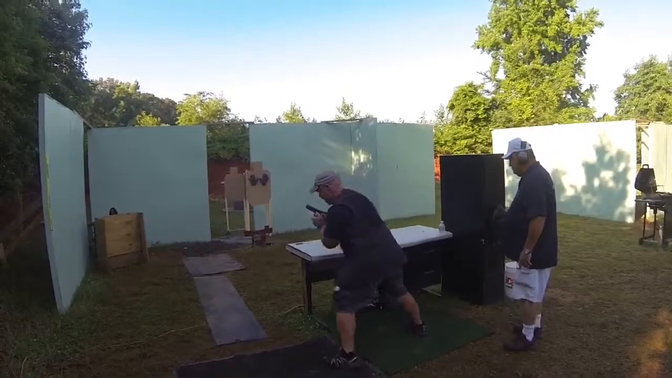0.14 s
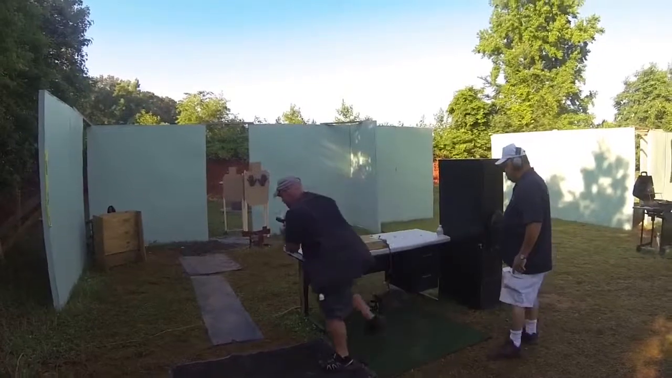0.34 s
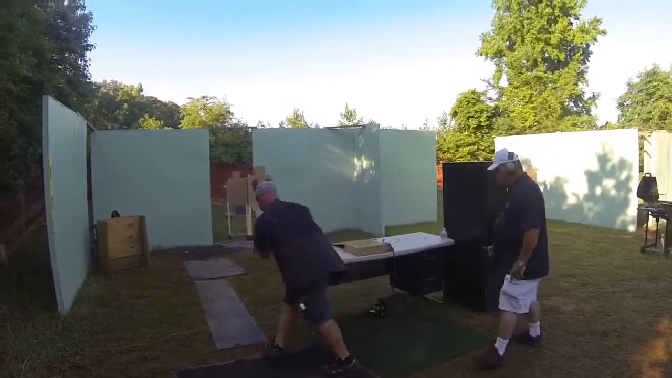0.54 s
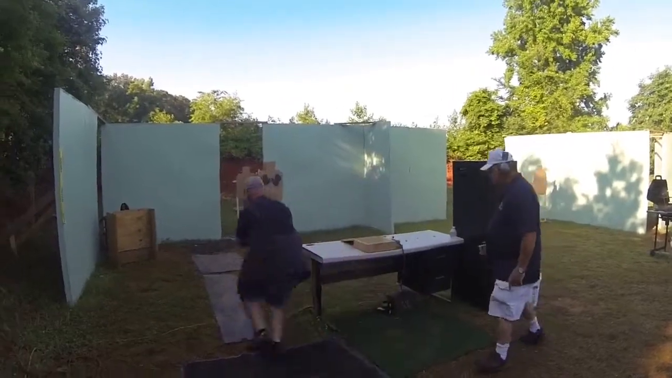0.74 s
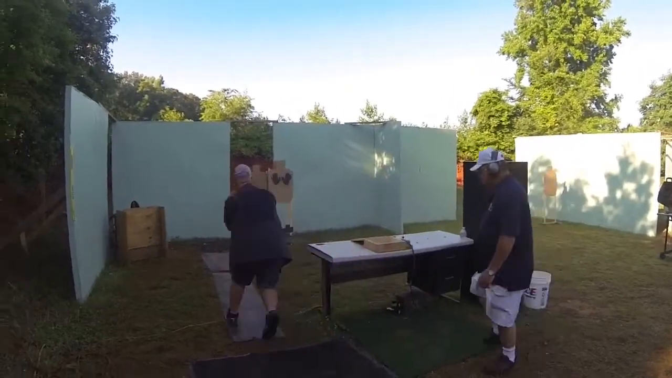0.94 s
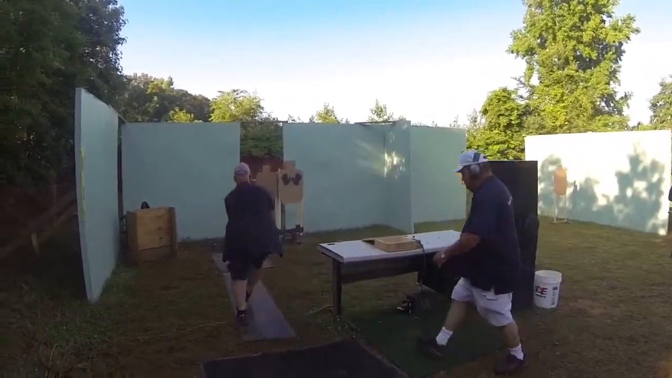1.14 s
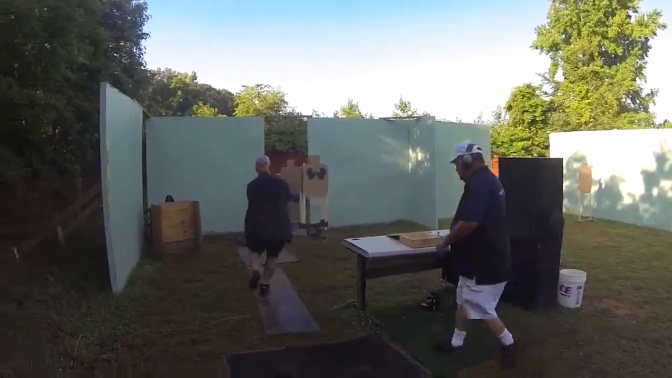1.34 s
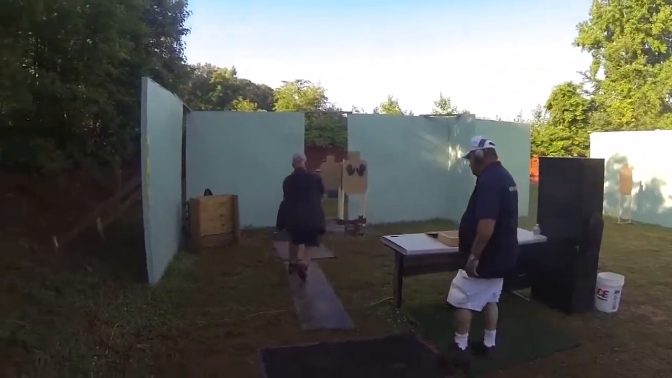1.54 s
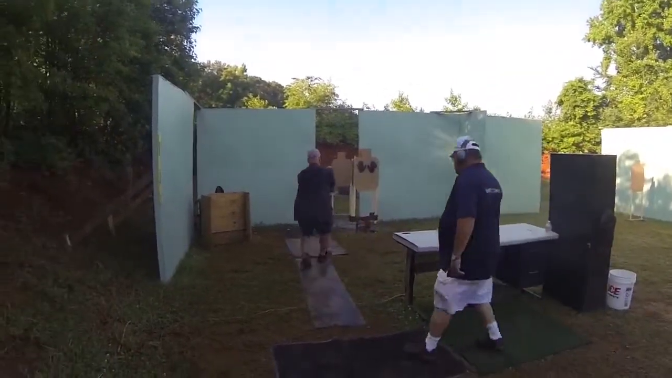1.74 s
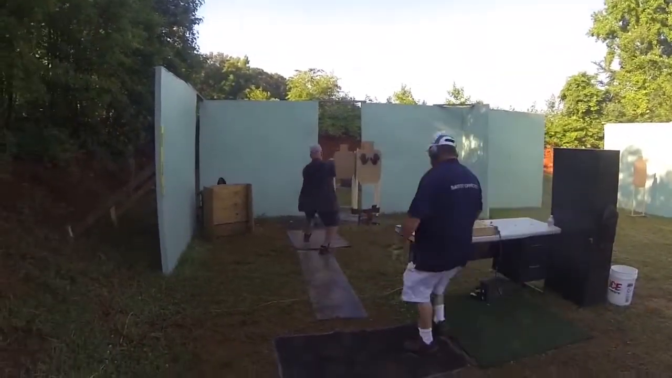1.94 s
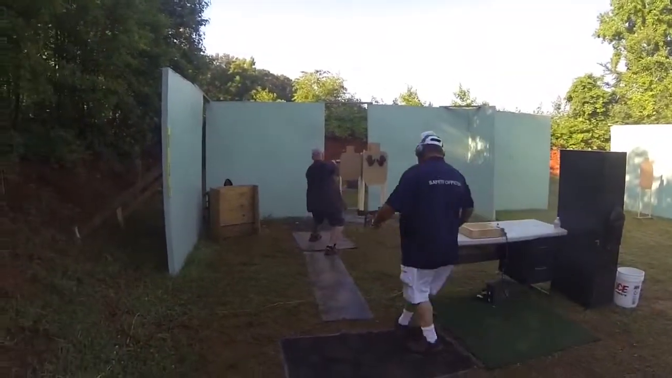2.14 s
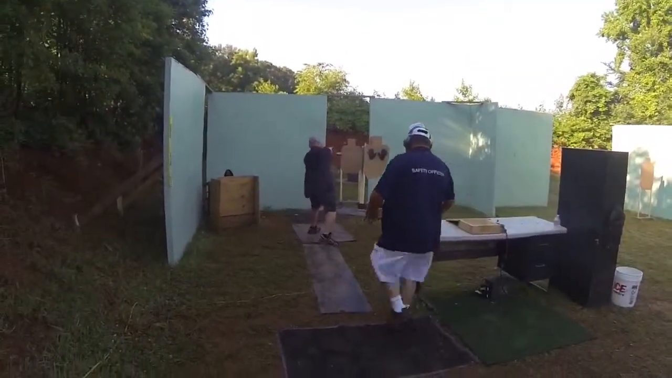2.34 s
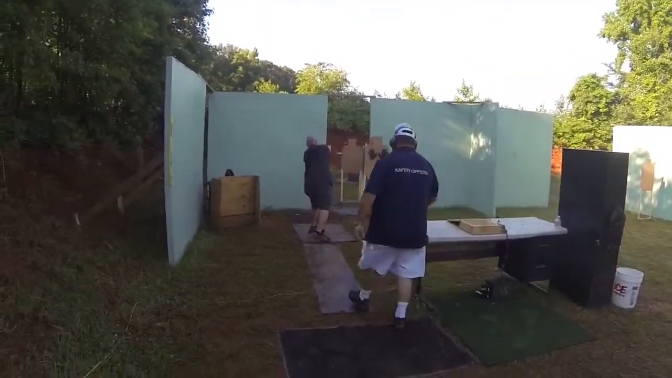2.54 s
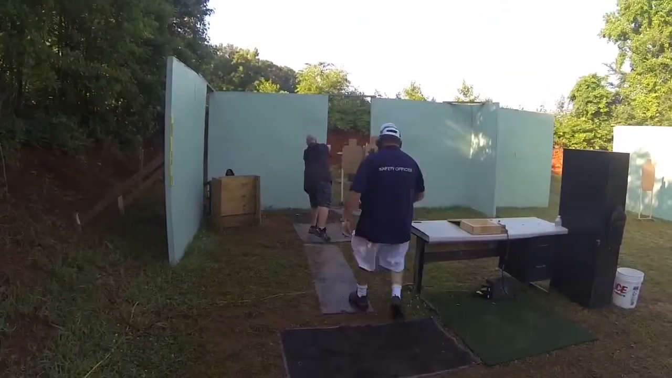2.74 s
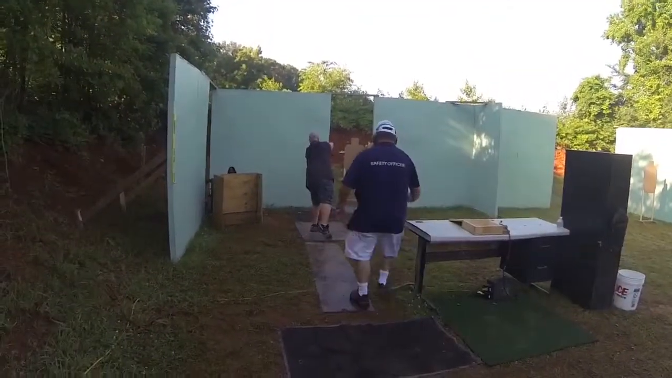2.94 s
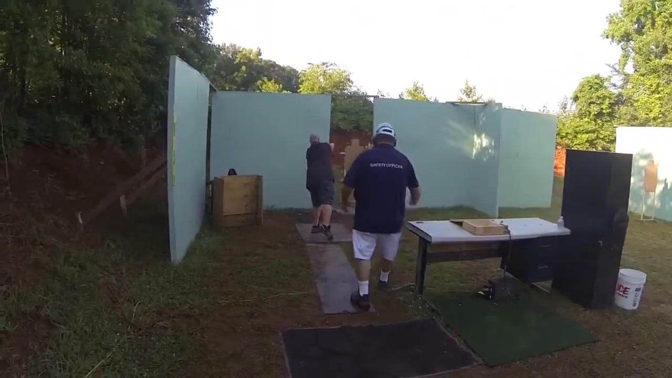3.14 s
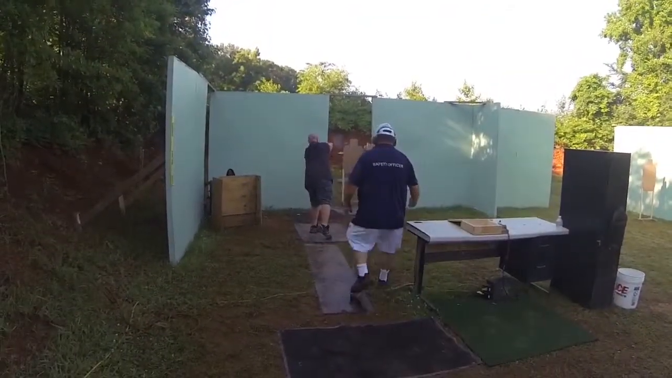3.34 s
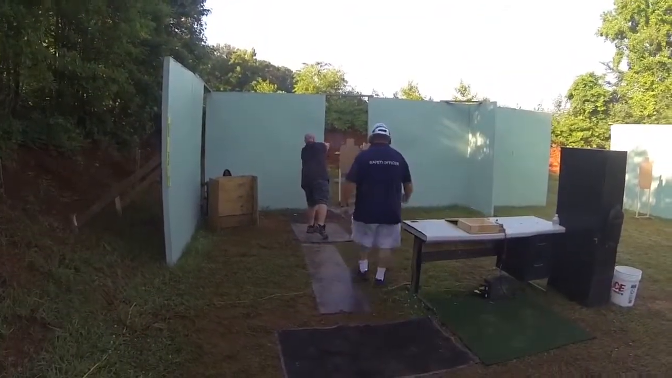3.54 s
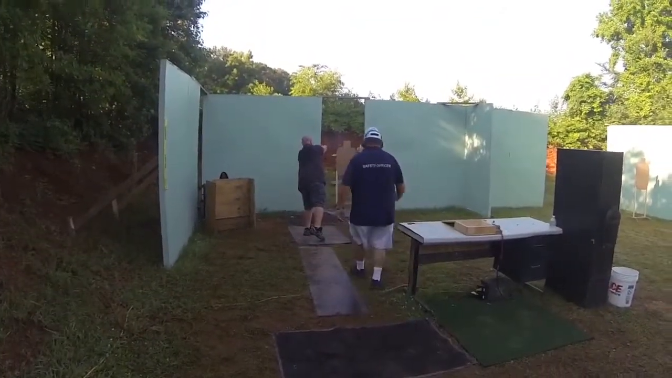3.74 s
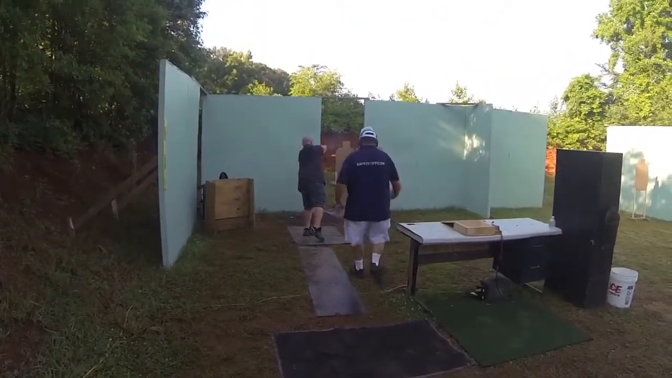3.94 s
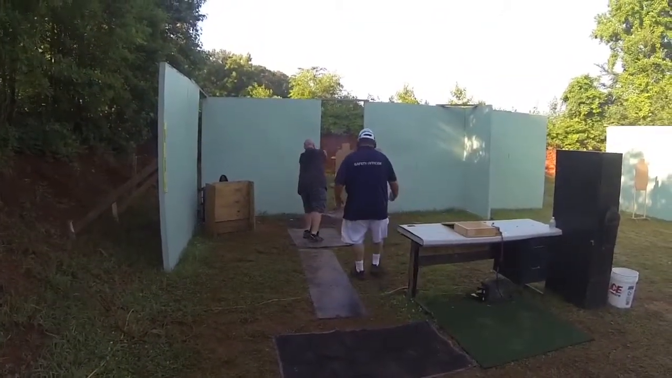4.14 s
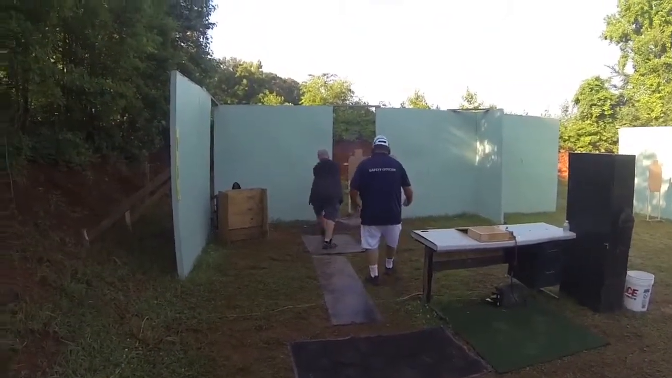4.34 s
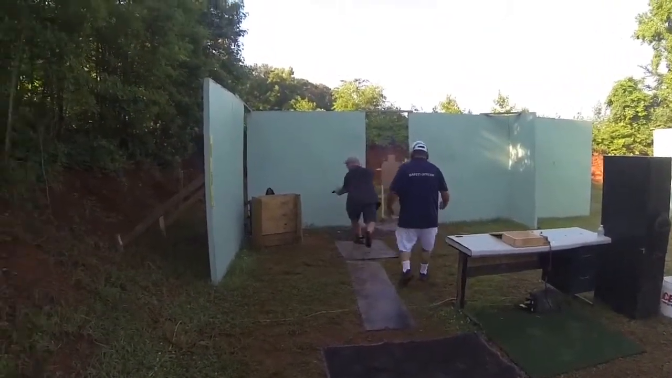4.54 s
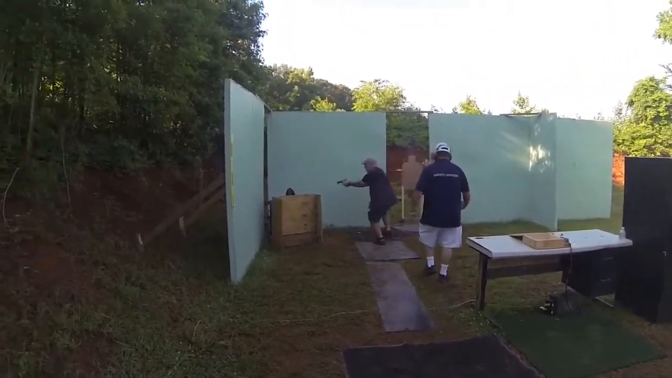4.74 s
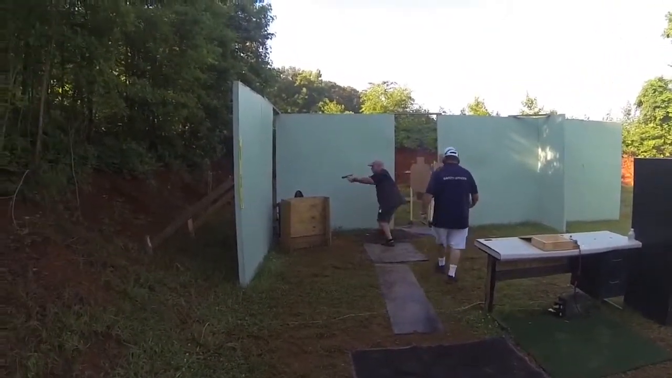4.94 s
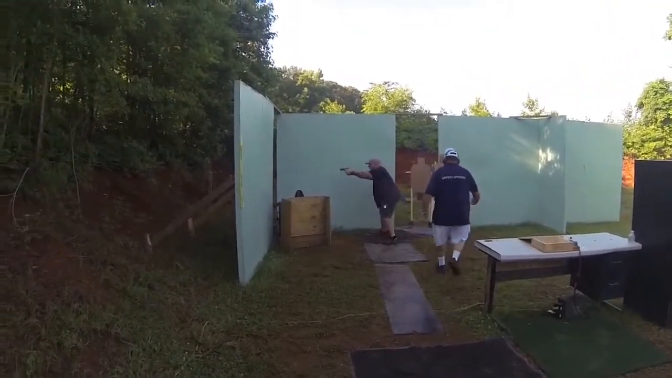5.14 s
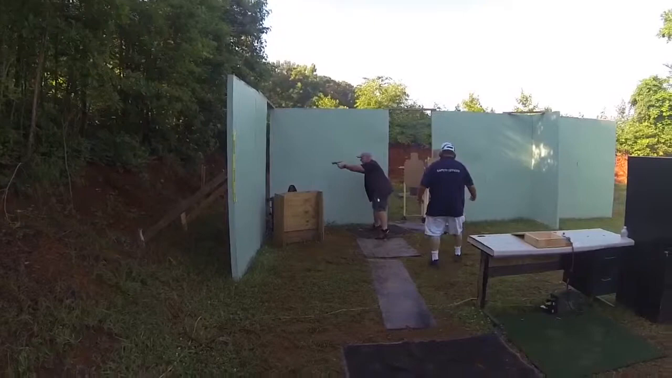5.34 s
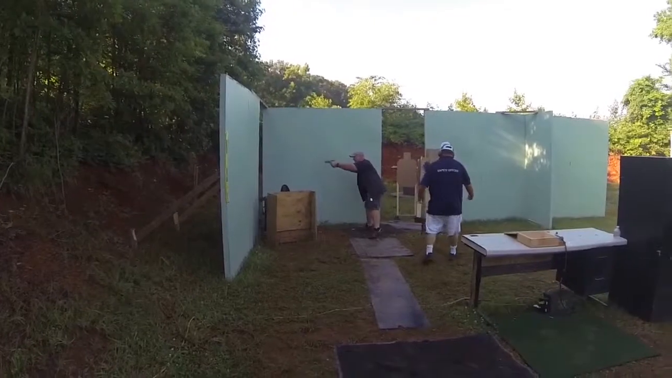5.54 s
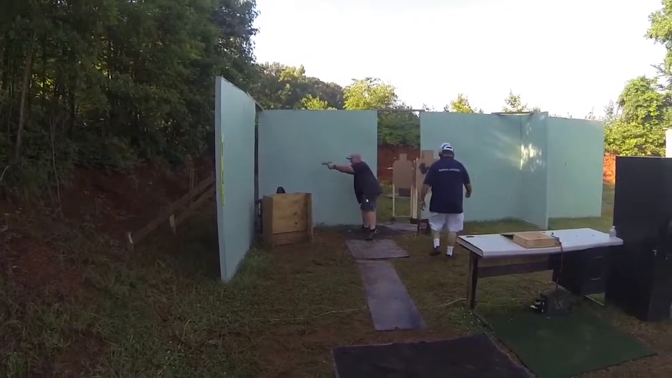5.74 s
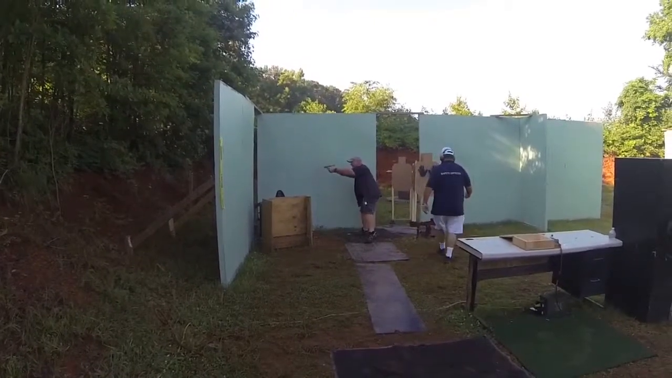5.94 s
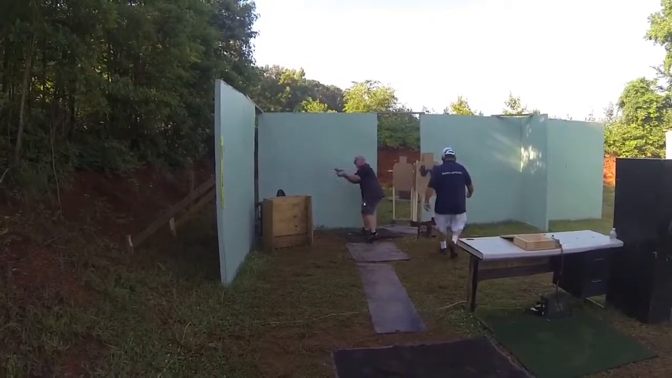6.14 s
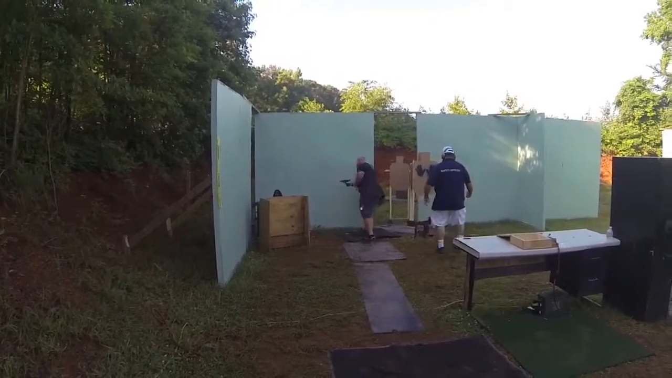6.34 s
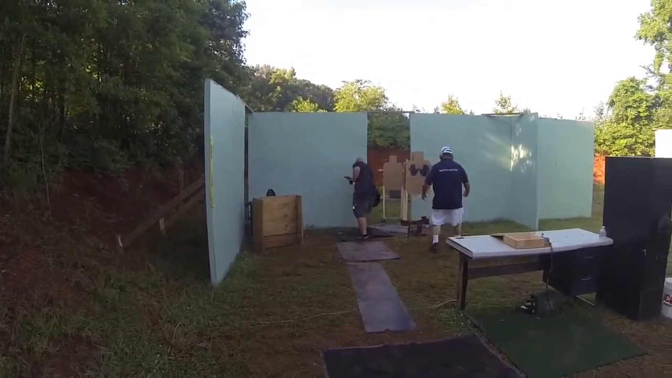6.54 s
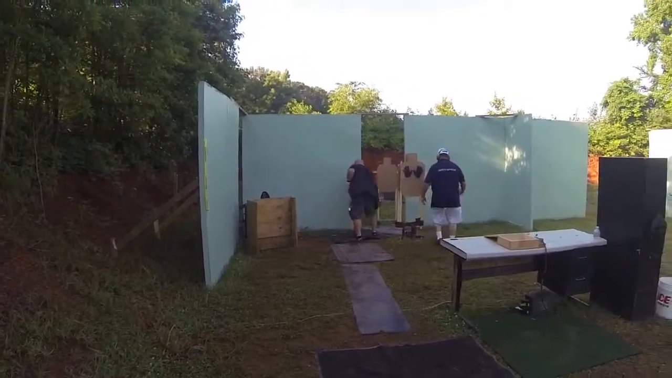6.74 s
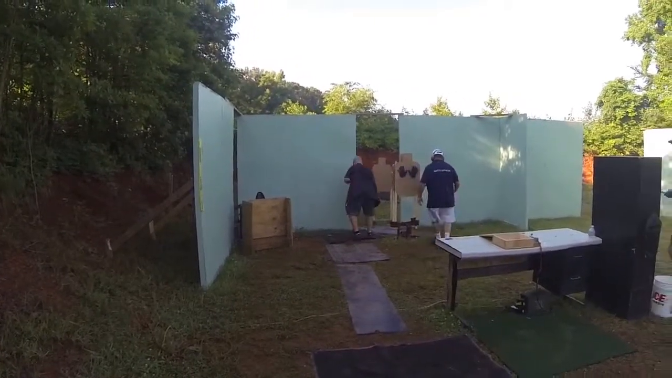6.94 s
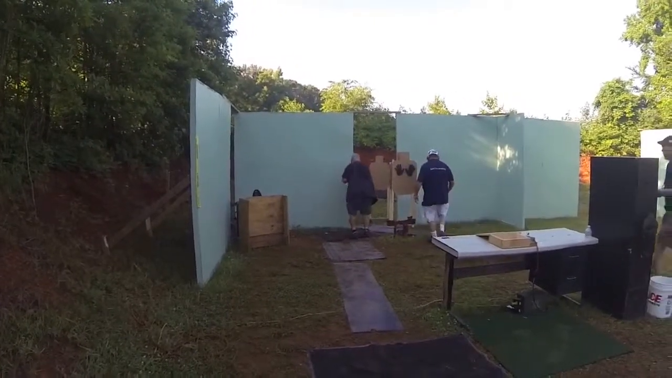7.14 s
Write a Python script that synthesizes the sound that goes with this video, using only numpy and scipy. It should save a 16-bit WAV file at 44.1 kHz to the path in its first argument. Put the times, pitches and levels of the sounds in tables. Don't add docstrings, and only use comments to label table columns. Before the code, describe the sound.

A small microphone sealed in a plastic case picks up leaf murmur, faint hiss, electronic ticking and low wind buffets. Muffled shots come from another bay, and a bird calls briefly. Two very loud handgun shots crack less than a second apart, then after a pause three more come fast, ringing boxily off walls and rolling into the trees. The background ducks after each, then creeps back; a small case tap and a faint distant shot close it.

```python
import sys
import numpy as np
from scipy import signal
from scipy.fft import rfft, irfft
from scipy.io import wavfile
from scipy.ndimage import uniform_filter1d, minimum_filter1d

SR = 44100
rng = np.random.default_rng(int(sys.argv[2]) if len(sys.argv) > 2 else 0)


def inscribe(sig):
    pcm = np.round(np.clip(np.atleast_2d(sig).T, -1, 1) * 32767)
    wavfile.write(sys.argv[1], SR, pcm.astype(np.int16))


def volts_from_db(level):
    exponent = np.asarray(level, float) / 20
    return 10 ** exponent


N = 317961

# frequency in Hz, level in dB.
LEAVES = [(100, 15.5), (400, 13), (1400, 1.7), (3000, 4.7), (8000, 6.3), (16000, 1.2)]
# frequency in Hz, level in dB per Hz.
HISS = [(120, -43), (250, -3), (1300, -11), (6000, -21), (11000, -24), (14000, -27.5), (16000, -31.5)]
# frequency in Hz, width in Hz, level in dB, phase in turns.
WHINES = [(7530, 1150, -74, .3), (14750, 220, -85.5, .1)]
# frequency in Hz, width in Hz, level in dB.
TICK_MODES = [(9150, 690, -11), (8240, 1200, -7), (5500, 3300, 4)]
# start in seconds, end in seconds, mean gap in seconds, gap spread 0-1.
WRITE_SPELLS = [(.278, .41, .064, .1), (.589, .73, .04, .1), (.8, 1.62, .062, .3), (3.54, 3.79, .062, .15),
                (4.12, 5.31, .0635, .12), (6.117, 6.17, .03, .1), (6.235, 7.0, .0635, .05)]
# frequency in Hz, level in dB.
RUMBLE = [(8, -5.5), (22, 1), (45, -9), (80, -18), (130, -28), (400, -78.5)]
# frequency in Hz, level in dB.
FLUTTER = [(60, -14.5), (110, -8.5), (200, 0), (250, -14.5), (320, -22.5), (800, -58)]
# time in seconds, buffet level in dB.
BREEZE = [(0, -42.5), (.4, -45.5), (.6, -43.5), (.95, -47.5), (1.4, -39.5), (2.0, -48), (3.0, -47.5),
          (3.4, -46), (3.8, -46), (4.1, -41.5), (4.4, -43), (5.0, -43.5), (5.399, -46), (5.7, -49),
          (6.201, -44), (6.601, -42.5), (7.21, -48)]
# start in seconds, length in
# seconds, buffet in dB, flutter in dB over its usual share.
GUSTS = [(0.468, 0.087, -37, -17), (.6, 0.21, -48, -4), (1.17, 0.16, -43.5, -2), (1.326, .1, -42, -2),
         (1.724, 0.074, -48, -4), (2.164, 0.12, -40.5, 14), (2.93, 0.078, -51, -17), (4.22, 0.2, -36, -1),
         (4.64, 0.032, -50, 0.5), (4.76, 0.069, -51, -20), (5.086, 0.083, -36.5, -3.5),
         (5.217, 0.094, -35.5, 4.5), (5.298, 0.046, -40.5, -1), (6.401, .1, -46.5, 7),
         (6.539, 0.061, -45, 10), (6.7, 0.065, -46, 10), (6.79, 0.07, -51.5, -1), (7.005, .08, -46, 7.5)]
# start and length in seconds, start and end frequency in Hz, level in dB.
MOANS = [(.5, .28, 37.6, 72.5, -43.5), (.76, 0.16, 72.6, 62, -48), (1.0, 0.3, 47.6, 71.8, -46),
         (1.45, .26, 93.6, 61.6, -51.5), (1.78, .11, 59, 50, -45.5), (4.3, 0.22, 61.3, 86.5, -46),
         (4.52, .15, 87.4, 65, -48.5)]
# start and length in seconds, start and end frequency in Hz, level in dB.
BIRD = [
    (1.738, .13, 5200, 5080, -71),
    (2.708, .03, 4240, 3800, -68),
    (3.05, 0.037, 4400, 3750, -65),
    (3.114, .03, 3520, 3170, -74),
]
# time in seconds, frequency in Hz, level in dB.
FLAPS = [(1.249, 194, -46.5), (1.33, 165, -40.5), (5.113, 190, -48), (5.241, 200, -42.5), (5.294, 200, -54),
         (5.325, 186, -43)]
# frequency in Hz, width in Hz, level in dB.
TAP_MODES = [(2110, 150, -43.5), (1510, 163, -58), (3100, 540, -55)]
# frequency in Hz, width in Hz, level in dB.
HOUSING_MODES = [(723, 466, -15.5), (1275.7, 130, 0), (1417.3, 116.5, 0), (1630, 117, -15),
                 (2350, 860, -16), (2960, 850, -17), (3314, 250, -18), (5226, 600, -22), (6320, 770, -27),
                 (7220, 1900, -28), (10200, 1900, -40.5), (13600, 3100, -49)]
# frequency in Hz, level in dB.
LEAK = [(40, -37.5), (150, -25.5), (400, -24.5), (1000, -29), (1900, -35), (3400, -39.5), (3900, -21.5),
        (8000, -38), (16000, -50)]
# time in seconds, muzzle blast peak in dB, wall scatter in dB, woods scatter in dB,
# rise of the scatter in seconds.
SHOTS = [
    (-.4, -20, -26.5, -27, .012),
    (0.0269, -14, -23, -31, .012),
    (2.1683, -13, -23, -31.5, 0.018),
    (3.1621, 21.5, 2, -22.5, 0.0026),
    (3.8525, 20.5, 0.5, -23.5, .004),
    (5.4227, 25, -4, -32.5, 0.0023),
    (5.633, 25.5, -5.5, -19, .004),
    (5.8157, 26.5, -3.5, -19.5, 0.0048),
    (6.992, -29.5, -24, -30, 0.078),
]
PLACES = [0, 0, 0, 1, 1, 2, 2, 2, 0]
# delay in ms, level in dB.
OTHER_BAY = [(2.6, 8), (11, -10.5), (24, -4), (31, 3), (48, -4)]
DOORWAY = [(.35, 7), (1.0, -1), (1.75, -3.5), (2.5, -6), (6.3, 2.5), (7.7, 5.5), (11.5, -6), (14.5, -12.5),
           (24, -13.5)]
SIDE_WALL = [(.4, 4), (1.05, -19.5), (1.75, 3.5), (2.45, -3), (3.15, 0.5), (4.6, -4.5), (6.5, -5.5),
             (11.8, -18.5), (17.5, -25.5)]
REFLECTIONS = [OTHER_BAY, DOORWAY, SIDE_WALL]
# plateau in seconds, T60 in seconds,
# tilt in dB per octave away from the middle, sag in dB per second.
WALLS = [
    (.11, .51, -2, 29.5),
    (0.019, 0.51, -.5, 51.5),
    (0.037, 0.71, 0, 47),
]
# slope echo delay in seconds, length in seconds, level in dB over the woods,
# loss in dB per second per kHz, woods T60 in seconds.
SLOPES = [
    (0.76, 0.5, 13, 4, 1.663),
    (0.5, 1, 2.5, 8, 3.61),
]
# depth in dB, grain in seconds, blend-in in seconds.
SEPARATE = [
    (4.5, 0.0011, 0.033),
    (6.9, 0.0037, .03),
]


def read(points, hz):
    f, value = np.transpose(points)
    return np.interp(np.log(hz + 1), np.log(f + 1), value)


def evened(x):
    return x / np.sqrt(np.mean(x ** 2) + 1e-20)


def add(mix, s, sound):
    at = round(s * SR)
    part, sound = mix[max(at, 0):], sound[max(-at, 0):]
    part[:len(sound)] += sound[:len(part)]


def noise(points):
    gain = volts_from_db(read(points, np.fft.rfftfreq(N, 1 / SR)))
    return evened(irfft(rfft(rng.standard_normal(N)) * gain, N))


def lumps(seconds, size=N):
    span = max(round(seconds * SR), 1)
    once = uniform_filter1d(rng.standard_normal(size), span)
    return evened(uniform_filter1d(once, span))


def ring(modes, size=600):
    t = np.arange(size) / SR
    return sum(volts_from_db(db) * np.exp(-np.pi * w * t) * np.sin(2 * np.pi * hz * t) for hz, w, db in modes)


def glides(calls, waver_hz):
    out = np.zeros(N)
    for s, long, hz0, hz1, db in calls:
        size = round(long * SR)
        hz = np.linspace(hz0, hz1, size) + waver_hz * lumps(.006, size)
        tone = np.sin(2 * np.pi * np.cumsum(hz) / SR)
        add(out, s, volts_from_db(db) * tone * signal.windows.tukey(size, .3))
    return out


def write_times():
    times = []
    for start, end, gap, spread in WRITE_SPELLS:
        beat = np.arange(start, end, gap)
        chance = rng.random((len(beat), 5))
        first = beat + (beat > start) * spread * gap * (2 * chance[:, 0] - 1)
        spacing = .005 + .010 * chance[:, 1:3]
        later = first[:, None] + np.cumsum(spacing, axis=1)
        times += [*first, *later[chance[:, 3:] < (.6, .15)]]
    return times


def electronics():
    frame_hz, hiss_db, tick_db = 59.94, -67.5, -62.5
    t = np.arange(N) / SR
    out = volts_from_db(hiss_db) * noise(HISS)
    for hz, width, db, phase in WHINES:
        skirt = [(hz - 2 * width, -60), (hz - width / 2, -3), (hz, 0), (hz + width / 2, -3), (hz + 2 * width, -60)]
        pulse_db = 4.8 * np.cos(2 * np.pi * (frame_hz * t - phase))
        out += volts_from_db(db + pulse_db) * noise(skirt)
    pip = signal.windows.hann(110) * np.sin(2 * np.pi * 11900 * t[:110])
    for s in write_times():
        for before in (.0025, .008):
            burst = signal.windows.hann(60) * rng.standard_normal(60)
            click = evened(np.convolve(burst, ring(TICK_MODES, size=60)))
            add(out, s - before, volts_from_db(tick_db - 4.5) * click)
        add(out, s - .0012, volts_from_db(tick_db + 0.5 + rng.standard_normal()) * pip)
    return out


def leaves():
    rustle_db = 1.6 * lumps(.06)
    return volts_from_db(-63 + 17 + rustle_db) * noise(LEAVES)


def wind():
    flutter_db, even_s = -20, .07
    buffet = volts_from_db(np.interp(np.arange(N) / SR, *np.transpose(BREEZE)))
    flutter = buffet * volts_from_db(flutter_db)
    for s, long, db, extra_db in GUSTS:
        swell = signal.windows.tukey(round(long * SR), .7)
        add(buffet, s, volts_from_db(db) * swell)
        add(flutter, s, volts_from_db(db + flutter_db + extra_db) * swell)
    rumble = noise(RUMBLE)
    rumble = rumble / np.sqrt(abs(uniform_filter1d(rumble ** 2, round(even_s * SR))) + .05)
    rumble = buffet * volts_from_db(lumps(.02)) * rumble
    flicker_db = 9 * np.tanh(0.76 * lumps(0.0087))
    return rumble + flutter * volts_from_db(flicker_db) * noise(FLUTTER)


def moans():
    return glides(MOANS, waver_hz=6.2)


def bird():
    return glides(BIRD, waver_hz=40)


def case_knocks():
    tap_s, scrape_s = 6.7485, .004
    out, t = np.zeros(N), np.arange(1500) / SR
    scrape = rng.standard_normal(1500) * np.exp(-abs(t - .012) / scrape_s) * 0.19
    scrape[round(.0125 * SR)] = 3.5
    add(out, tap_s - .011, np.convolve(scrape, ring(TAP_MODES, size=900)))
    for s, hz, db in FLAPS:
        add(out, s, ring([(hz, 25, db), (hz / 5, 14, db + 8)], size=2500))
    return out


def housing(x):
    hz = abs(np.fft.fftfreq(8192, 1 / SR))
    power = volts_from_db(2 * read(LEAK, hz))
    for f, w, db in HOUSING_MODES:
        power = power + volts_from_db(2 * db) / (1 + (2 * (hz - f) / w) ** 2) ** 1.463
    log_gain = np.log(power) / 2
    phase = -signal.hilbert(log_gain).imag
    taps = np.fft.ifft(np.exp(log_gain + 1j * phase)).real[:4096]
    return signal.oaconvolve(x, taps)[:N]


def blast(echoes):
    t = np.arange(300) / SR
    out, wobble = np.zeros(4000), rng.standard_normal((len(echoes) + 1, 2))
    far = 0.25 * (echoes is OTHER_BAY)
    direct = (0.041, 0.015)
    for (ms, echo_db), (early, louder) in zip([direct, *echoes], wobble):
        u = t / (.0001 * (1 + 0.24 * min(ms, 12) + far))
        wave = np.convolve((u - 1) * np.exp(-u), signal.windows.hann(5 + 18 * (far > 0)))
        rough = rng.standard_normal(120) * np.exp(-np.arange(120) / 60.0) * 0.07
        front = np.convolve(evened(wave), np.r_[1, rough])
        add(out, ms * (1 + 0.021 * early) / 1000, volts_from_db(echo_db + .5 * louder) * front)
        gas = np.diff(rng.standard_normal(301)) * np.exp(-t / 0.0014)
        boom = -np.sin(2 * np.pi * 620 * t) * np.exp(-t / 0.00039)
        add(out, ms / 1000, volts_from_db(echo_db) * (volts_from_db(8.0 - 20 * far) * gas + volts_from_db(4.5 - 40 * far) * boom))
    return out


def lingering(hz, t, db, centre_hz, steep, t60, offset_hz=1):
    octaves = np.log2((hz + offset_hz) / centre_hz)
    return volts_from_db(db - steep * octaves ** 2 - 60 * t / t60)


def scatter(walls_db, woods_db, rise, place):
    plateau, t60, tilt, sag = WALLS[place]
    elsewhere = int(place == 0)
    size = 2 * SR
    hz, t, z = signal.stft(rng.standard_normal((2, size)), SR, nperseg=256)
    hz = hz[:, None]
    khz = hz / 1000 + 0.35
    late = np.clip((t + 0.0048) / (rise * khz / 4.76), 0, 1)

    colour_db = tilt * abs(np.log2(khz / 1.37))
    decay_db = 60 * np.maximum(t - plateau, 0) / t60 + (sag + 1.9 * khz) * t
    walls = late * volts_from_db(walls_db + colour_db - decay_db)
    walls *= 1 + elsewhere * lingering(hz, t, 9, 1700, 40, 0.24)
    walls *= 1 + elsewhere * lingering(hz, t, 14, 200, 16, 0.66, offset_hz=50)

    s, long, db, dull, woods_t60 = SLOPES[elsewhere]
    slope_db = db * np.exp(-abs(2 * (t - s - long / 2) / long) ** 4)
    loss_db = 60 * t / woods_t60 + dull * khz * np.minimum(t, 1.2) + 2.1 * abs(np.log2(khz / 1.87))
    woods = late * volts_from_db(woods_db + slope_db - loss_db)
    woods *= 1 + (place > 0) * lingering(hz, t, 8.5, 330, 25, 1.5)

    walls, woods = signal.istft(z * [walls, woods], SR, nperseg=256)[1][:, :size]
    t = np.arange(size) / SR
    depth_db, grain, blend = SEPARATE[int(place > 0)]
    separate = volts_from_db(depth_db * lumps(grain, size) * np.exp(-t / blend))
    fade = np.clip(t / (0.15 * rise), 0, 1) * np.clip((2 - t) / .3, 0, 1)
    return (walls * separate + woods) * fade * volts_from_db(15)


def shots():
    out = np.zeros(N)
    for (s, peak_db, *space), place in zip(SHOTS, PLACES):
        wave = blast(REFLECTIONS[place])
        add(out, s, volts_from_db(peak_db) * wave / abs(housing(wave)).max())
        add(out, s, scatter(*space, place))
    return out


def scene():
    outside = leaves() + shots()
    direct = electronics() + wind() + moans() + bird() + case_knocks()
    return (direct + housing(outside))[None]


def band_limit(x):
    return signal.sosfilt(signal.butter(12, 16490, fs=SR, output="sos"), x)


def record(dry):
    climb_db_s, ceiling_db, edge_hz = 20.5, 2.3, 15300
    ahead = round(.011 * SR)
    peak_db = 20 * np.log10(abs(dry[0]) + 1e-9)
    peak_db[0] = 13.0
    climb = np.arange(N) * climb_db_s / SR
    held_db = np.maximum.accumulate(peak_db + climb) - climb
    over_db = np.maximum(held_db - ceiling_db, 0)
    over_db = -minimum_filter1d(-over_db, 2 * ahead)
    x = dry / volts_from_db(uniform_filter1d(over_db, 60))
    x = x / (1 + abs(x) ** 14) ** (1 / 14)
    lowpass = signal.firwin(255, edge_hz, window=("kaiser", 8), fs=SR)
    x = signal.oaconvolve(x, lowpass[None], "same")
    return band_limit(x)


dry = scene()
out = record(dry)
inscribe(out)
```